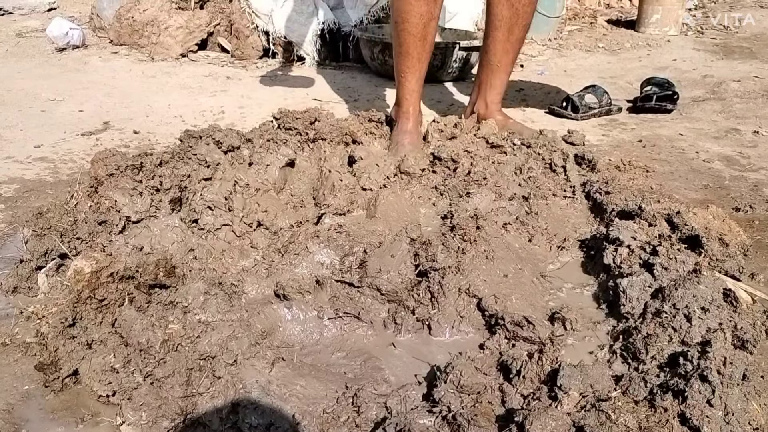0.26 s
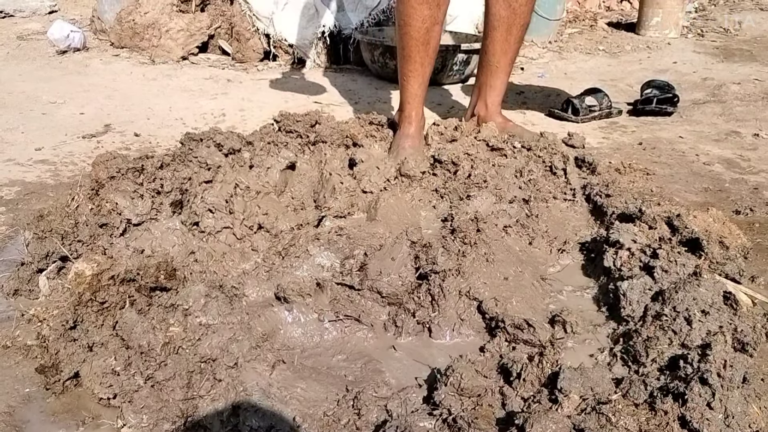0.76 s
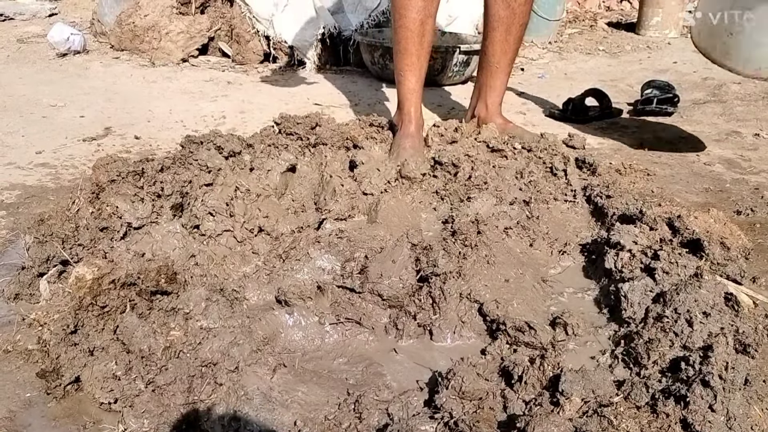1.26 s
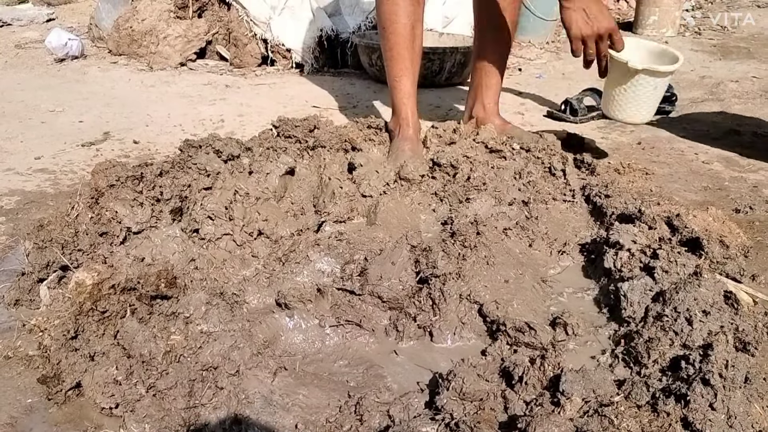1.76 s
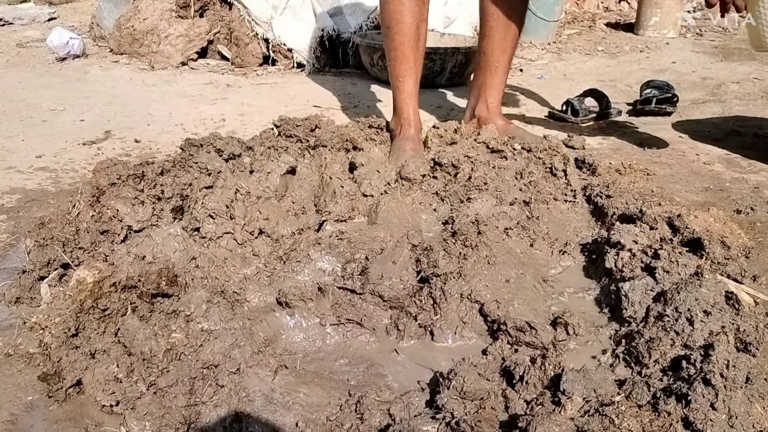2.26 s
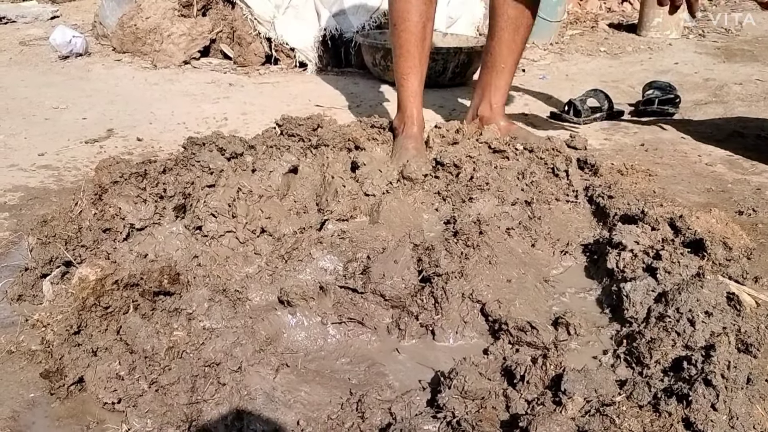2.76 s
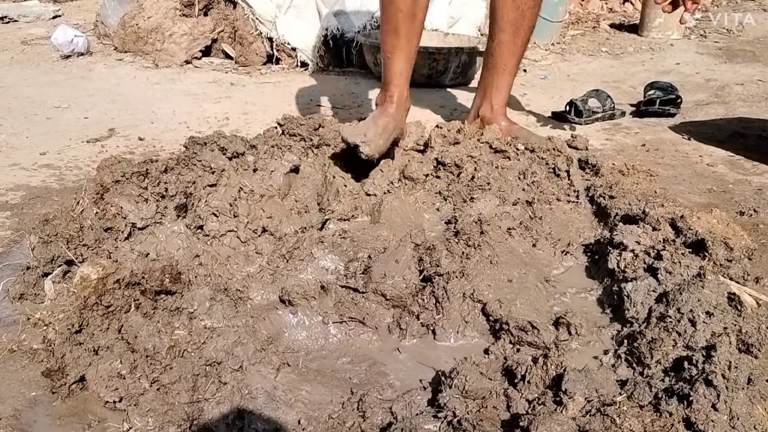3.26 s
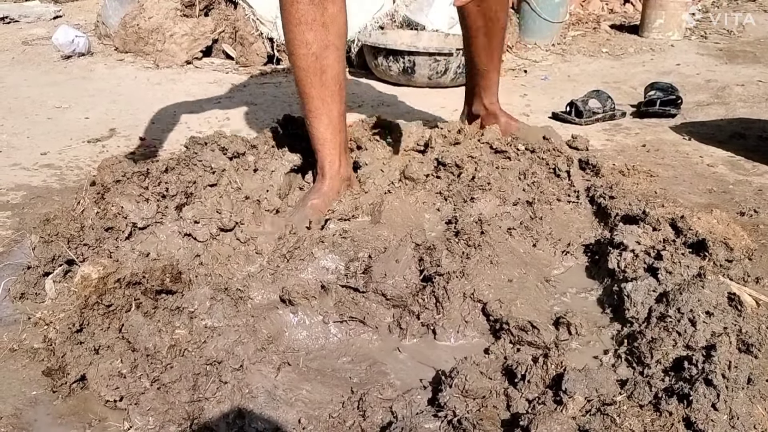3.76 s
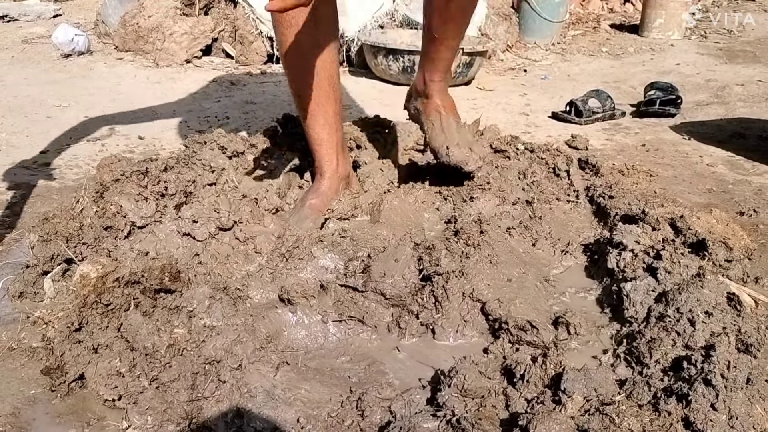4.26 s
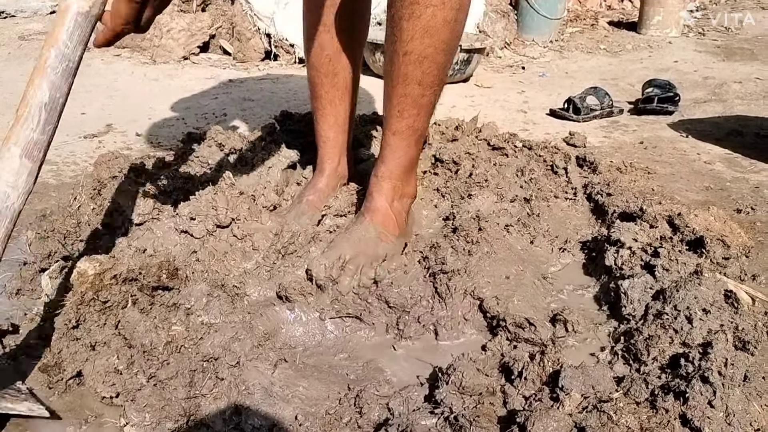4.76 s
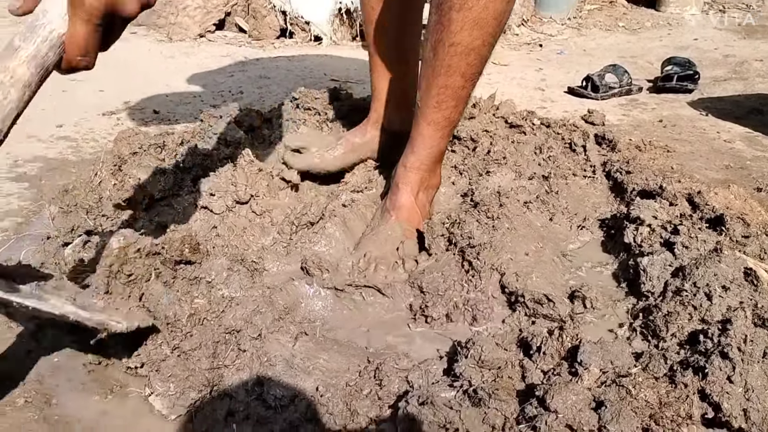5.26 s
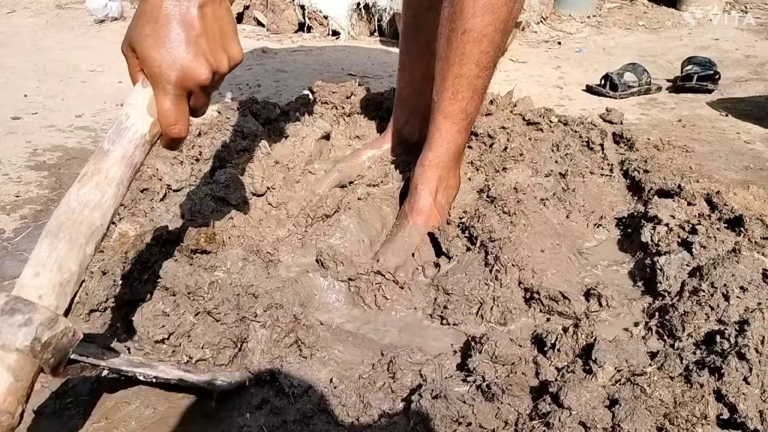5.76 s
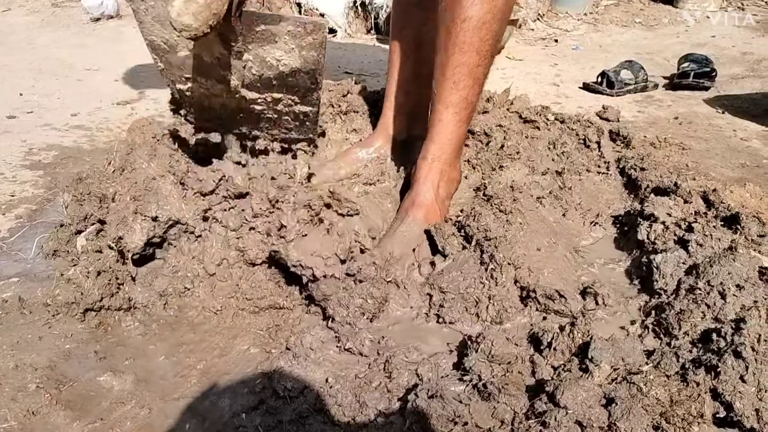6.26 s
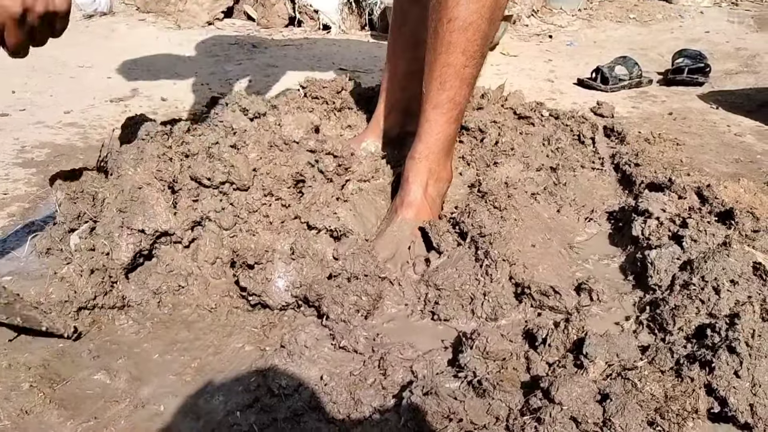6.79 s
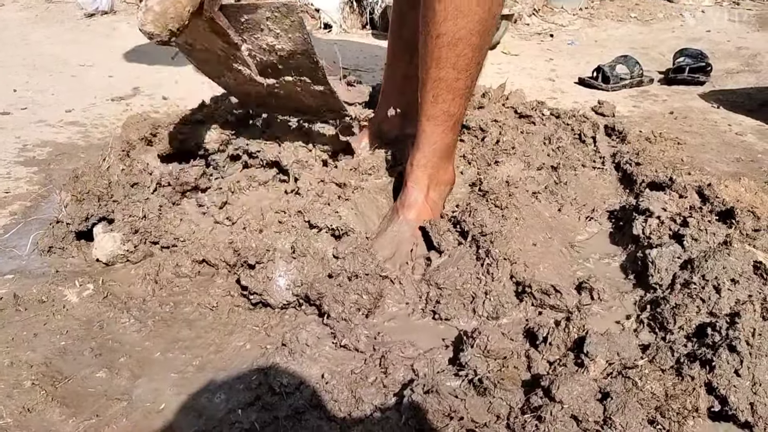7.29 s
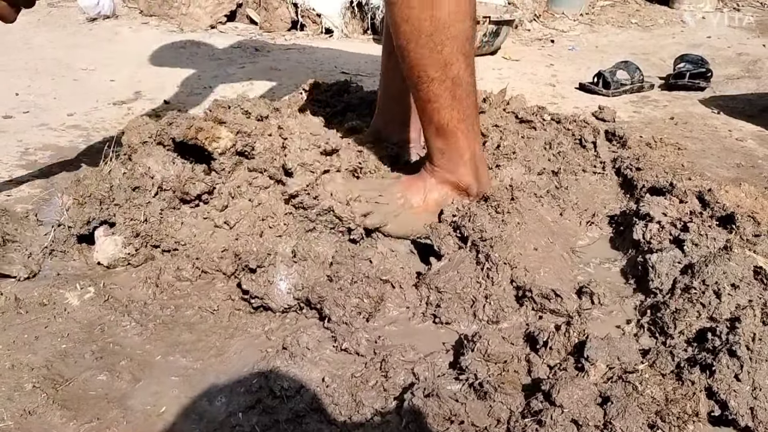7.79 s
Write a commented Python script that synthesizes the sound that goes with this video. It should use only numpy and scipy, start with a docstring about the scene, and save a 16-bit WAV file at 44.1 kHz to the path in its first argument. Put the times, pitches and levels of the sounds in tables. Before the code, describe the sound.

Close to the microphone outdoors, wet clay gives one short squelch, then a plastic tub and a jug hit the ground in turn, ringing hollowly and rattling as they settle. Bare feet begin treading the clay and a hoe joins in, with sticky slaps, sucking tears and little bursts of air. Behind it all a small engine chugs on, with light hiss, a little wind and faint distant birds.

```python
"""Wet clay and a yard engine

Across a yard a small one-cylinder engine putters steadily, its puffs ringing the exhaust pipe, its beat
skipping now and then at cuts in the sound. Hiss, drone, wind and far birds lie behind. A plastic tub
and jug are dropped and rock to rest, their walls ringing. Bare feet and a hoe slap, crackle and suck in
wet clay as it tears and its air pockets burst, close to a phone whose left port hears more treble."""
import sys
import numpy as np
from scipy import signal
from scipy.fft import rfft, irfft
from scipy.io import wavfile
from scipy.ndimage import uniform_filter1d

SR = 44100
rng = np.random.default_rng(int(sys.argv[2]) if len(sys.argv) > 2 else 0)


def unload_wav(signal):
    """Save mono or channel-first audio to the path in sys.argv[1] as 16-bit WAV at rate SR, clipped to [-1, 1]."""
    wavfile.write(
        sys.argv[1],
        SR,
        np.round(np.clip(np.atleast_2d(signal).T, -1, 1) * 32767).astype(np.int16),
    )


N = 354123
T = np.arange(N) / SR


def undb(db):
    """Level to gain."""
    return 10 ** (np.asarray(db, float) / 20)


def unit_rms(x):
    """Scale to rms 1."""
    return x / np.sqrt(np.mean(x ** 2))


def unit_peak(x):
    """Scale to peak 1."""
    return x / np.abs(x).max()


def decay(t, t60_s):
    """Fall of 60 dB per t60_s."""
    return 1000 ** (-t / t60_s)


def colour(x, points, db_scale=1):
    """Minimum-phase filter through (f/Hz, gain/dB) points."""
    hz, db = np.transpose(points)
    bin_db = np.interp(np.log(np.arange(1025) * SR / 2048 + 1), np.log(hz), db)
    cepstrum = irfft(db_scale * np.log(undb(bin_db)))
    cepstrum[1:1024] *= 2
    cepstrum[1025:] = 0
    return signal.oaconvolve(x, irfft(np.exp(rfft(cepstrum))))[:len(x)]


def band(x, hz, width_hz):
    """Resonance, unity gain at centre."""
    return signal.lfilter(*signal.iirpeak(hz, hz / width_hz, SR), x)


def highpass(x, hz):
    """Bass cut, 4th order."""
    return signal.sosfilt(signal.butter(4, hz, "high", fs=SR, output="sos"), x)


def walk(rate_hz):
    """Slewed random steps, spread of order 1."""
    hold = int(SR / rate_hz)
    steps = rng.standard_normal(N // 50)[:N // hold + 1]
    return 1.71 * uniform_filter1d(np.repeat(steps, hold)[:N], hold)


def grit(size, spread_db):
    """Crackle: noise with uneven sample sizes, rms 1."""
    noise = rng.standard_normal(size)
    return unit_rms(noise * undb(spread_db * np.minimum(rng.exponential(size=size), 4)))


def add(track, start_s, sound):
    """Mix into track in place."""
    i = int(start_s * SR)
    track[..., i:i + sound.shape[-1]] += sound[..., :N - i]


def ports(x, pan_db, direct_share, lag_samples=0):
    """Two microphone ports: direct sound, left lagging, plus scattered paths."""
    spectra = rfft(rng.standard_normal((2, 128)) * np.exp(-np.arange(128) / 16))
    paths = np.pad(irfft(spectra / np.abs(spectra)), ((0, 0), (0, 300)))
    paths = highpass(paths, 295)  # long waves reach both ports alike
    scattered = np.array([signal.oaconvolve(x, path)[:len(x)] for path in paths])
    direct = np.array([np.roll(x, lag_samples), x])
    both = np.sqrt(direct_share) * direct + np.sqrt(1 - direct_share) * scattered
    return both * undb(np.array([[pan_db], [-pan_db]]) / 2)


# gusts: t/s, relative level/dB
GUSTS = [(0.0, -66), (0.67, -46.5), (1.7, -59), (1.85, -63), (3.4, -74), (4.6, -88), (5.0, -71),
         (6.2, -92.5), (8.03, -71)]


def wind():
    """Gusts rumble on the ports, nearly alike at both."""
    passband = signal.butter(2, [22, 75], "band", fs=SR, output="sos")
    noise = signal.sosfilt(passband, rng.standard_normal((3, N)))
    rumble = unit_rms(noise[0] + 0.098 * noise[1:])
    return rumble * undb(np.interp(T, *np.transpose(GUSTS)) - 8 + 2.2 * walk(7.7))


# pitch contours by name: f/Hz at even steps
TUNES = {"rise": [3950, 4100, 4800, 5050], "flat": [4300, 4380, 4350, 4270], "arch": [1244, 1290, 1260,
         1180], "hook": [1100, 1315, 1345, 1345, 1335, 1310, 1260]}
# calls: t/s, length/s, level/dB, tune
BIRD_CALLS = [(0.77, 0.12, -62, "rise"), (1.73, 0.13, -54, "flat"), (1.88, 0.4, -55, "arch"),
              (2.66, 0.12, -61, "rise"), (2.77, 0.33, -51, "hook"), (3.96, 0.11, -70, "rise"),
              (4.74, 0.11, -62, "rise")]


def birds():
    """Thin whistles, blurred by distance into narrow noise."""
    out, low_flutter, high_flutter = np.zeros(N), walk(130), walk(290)
    for s, length_s, db, tune in BIRD_CALLS:
        span = slice(int(s * SR), int((s + length_s) * SR))
        hz = np.interp(T[span], np.linspace(s, s + length_s, len(TUNES[tune])), TUNES[tune])
        blur = 1 + .9 * (low_flutter if hz[0] < 2000 else high_flutter)[span]
        whistle = np.sin(2 * np.pi * np.cumsum(hz) / SR)
        out[span] += undb(db) * signal.windows.tukey(len(hz), .35) * blur * whistle
    return ports(out, pan_db=8, direct_share=.95, lag_samples=3)


# yard swell: t/s, relative level/dB, drone offset/dB
YARD_SWELL = [(0.0, -52, 1.5), (0.8, -50, 2), (1.2, -53.5, 3.5), (1.802, -50.5, 3.5), (2.37, -51, 5.5),
              (2.7, -52.5, 1.5), (3.15, -51.5, 4.5), (3.499, -54.5, 4), (4.27, -53.5, 1.5),
              (4.74, -55.5, 3), (5.3, -55, 0.5), (5.999, -52, 2), (6.552, -48, 1), (6.802, -60.5, 2.5),
              (7.1, -46, -5.5), (7.35, -60.5, 3), (7.7, -54, -2.5), (8.03, -56.5, 10)]
# hum envelope: t/s, level/dB
HUM_LEVELS = [(0.0, -60.5), (0.87, -52), (1.25, -62.5), (1.65, -73), (2.21, -53.5), (2.59, -62.5),
              (2.97, -63), (3.13, -34.5), (3.4, -60), (4.18, -63), (5.03, -53), (5.46, -69.5), (6.06, -49),
              (6.93, -66.5), (7.58, -63.5), (8.03, -62)]
# drone spectrum: f/Hz, gain/dB
DRONE_SPECTRUM = [(15, -36.5), (25, -31.5), (85, -13), (145, -1), (189, -3.5), (257, -4.5), (312, -7.5),
                  (474, -13.5), (700, -68), (910, -61.5), (1540, -120)]
# hiss spectrum: f/Hz, gain/dB
HISS_SPECTRUM = [(350, -29.5), (600, -5), (731, -13.5), (883, -3.5), (1210, 3), (1580, -8.5), (1840, -3),
                 (2500, 2.5), (2760, 0.5), (3860, 0), (4480, -11.5), (5740, -6), (6400, -26), (8320, -83),
                 (14100, -120)]
# port imbalance: f/Hz, left minus right/dB
PORT_BALANCE = [(60, -2), (100, -0.5), (170, 3), (290, 3.5), (490, 1.5), (830, 3.5), (1400, 10.5),
                (2370, 10.5), (4010, 10.5), (6780, -1.5)]


def yard(gas_envelope):
    """Drone and hum; background hiss and engine gas, with a warble like compressed audio."""
    s, level_db, drone_db = np.transpose(YARD_SWELL)
    swell = undb(np.interp(T, s, level_db) + 1.7 * walk(25))
    hum_gain = undb(np.interp(T, *np.transpose(HUM_LEVELS)) + 2.5 * walk(5))
    hum = hum_gain * unit_rms(band(rng.standard_normal(N), hz=383.7, width_hz=14))
    drone = unit_rms(colour(rng.standard_normal(N), DRONE_SPECTRUM))
    drone *= swell * undb(np.interp(T, s, drone_db))
    warble = [(hz, undb(2.3 * walk(26))) for hz in np.geomspace(700, 6300, 15)]
    out = []
    for side in (.5, -.5):  # left, right
        noise = grit(N, 0.5)
        warbled = sum(gain * band(noise, hz, hz / 9) for hz, gain in warble)
        hiss = (undb(2) * swell + gas_envelope) * unit_rms(colour(warbled, HISS_SPECTRUM))
        out.append(colour(hiss + drone + hum, PORT_BALANCE, db_scale=side))
    return np.array(out)


# runs of steady puffs between cuts in the sound: first t/s, last t/s, first level/dB, last level/dB
PUFF_RUNS = [(0.024, 0.024, -33, -33), (0.06, 0.368, -31.5, -28), (0.485, 1.02, -28.5, -33),
             (1.135, 1.915, -31.5, -32.5), (1.993, 2.527, -34, -34), (2.644, 3.338, -34, -32),
             (3.457, 4.313, -39, -39), (4.436, 4.523, -38, -38), (4.477, 4.889, -36, -31),
             (4.933, 5.183, -33, -33), (5.139, 5.553, -33, -35), (5.712, 6.1, -34, -32),
             (6.178, 6.729, -32, -33), (6.808, 6.886, -38, -42), (7.004, 7.235, -36, -32),
             (7.353, 7.976, -32, -30)]
# weaker pulses after a puff: delay/s, gain
AFTER_PULSES = [(.0115, .22), (.029, .14), (.0385, -.24), (.053, .08)]
# exhaust pipe modes: f/Hz, width/Hz, relative level/dB
PIPE_MODES = [(203, 106, 3), (347, 390, 0.5)]


def engine(period_s=.079, scatter_db=1.5):
    """Puffs ring the pipe and spit a little gas; returns thump and gas envelope."""
    beats = np.zeros(N)
    for first_s, last_s, first_db, last_db in PUFF_RUNS:
        count = round((last_s - first_s) / period_s) + 1
        db = np.linspace(first_db, last_db, count) + scatter_db * rng.standard_normal(count)
        beats[(np.linspace(first_s, last_s, count) * SR).astype(int)] = undb(db)
    pulses, t = np.zeros(4000), T[:4000]
    pulses[0] = 1
    for delay_s, gain in AFTER_PULSES:
        pulses[int(delay_s * SR)] = gain
    ring = sum(undb(db) / width_hz * band(band(pulses, hz, width_hz), hz, width_hz)
               for hz, width_hz, db in PIPE_MODES)
    puff = highpass(np.convolve(ring, np.hanning(110)), 90)  # valve opens over a few ms
    spit = undb(-13) * np.exp(-t / 0.007) * (1 - np.exp(-t / 0.003))
    return signal.oaconvolve(beats, unit_peak(puff))[:N], signal.oaconvolve(beats, spit)[:N]


def wall_ring(t, modes, tilt_db, stiffness, light):
    """One blow rings the wall, peak 1; stiffer is shorter. Light knocks land anywhere, ground-damped."""
    scatter = rng.standard_normal((len(modes), 3)) * light
    t60_scale = .5 if light else 1
    ring = np.zeros(len(t))
    for (hz, db, t60_s), (jitter, detune, phase) in zip(modes, scatter):
        gain = undb(db + tilt_db * np.log2(hz / 300) + 2.9 * jitter)
        tone = np.sin(2 * np.pi * hz * (1 + 0.011 * detune) * t + phase)
        ring += gain * tone * decay(t, t60_scale * t60_s)
    push = np.hanning(max(int(SR * 0.0046 * (1.05 - np.clip(stiffness, 0, 1))), 3))
    ring = signal.fftconvolve(ring, push)[:len(t)]
    return unit_peak(highpass(ring, 178))  # small source, no deep bass


# plastic crack spectrum: f/Hz, gain/dB
CRACK_SPECTRUM = [(500, -29.5), (1100, 2), (1700, -14.5), (2900, -0.5), (4000, -12.5), (5500, -31),
                  (6800, -45), (9000, -55)]


def vessel(knocks, modes, rim_modes, rocking, stiffness, stiffness_per_db, polarity):
    """Knocks ring plastic, thump soil and crack grit; hard ones ring the rim and snap. Rocking rumbles."""
    wall, crack, snap = np.zeros((3, N))
    t = T[:13000]
    soil_thump = undb(-28.5) * np.hanning(int(0.0082 * SR))
    crack_envelope = decay(t[:2000], 0.069) + 0.74 * np.exp(-t[:2000] / 0.0002)
    rim = sum(undb(db) * np.sin(2 * np.pi * hz * t) * decay(t, t60_s) for hz, db, t60_s in rim_modes)
    for s, db, crack_db, tilt_db in knocks:
        ring = wall_ring(t, modes, tilt_db, stiffness + stiffness_per_db * db, light=db < -6)
        add(wall, s + 0.0017, polarity * undb(db) * ring)  # -1: wall moves inward first
        add(wall, s + 0.0011, -undb(db) * soil_thump)
        add(wall, s + .003, undb(2 * db) * rim)
        add(crack, s + 0.00051, undb(db + crack_db) * grit(2000, 0.63) * crack_envelope)
        add(snap, s + .002, undb(3 * db - 15) * grit(400, 1.5) * np.exp(-t[:400] / .0012))
    scrape = grit(N, 0.94) * undb(2 * walk(63))
    rumble = unit_rms(sum(undb(db) * band(scrape, hz, 21) for hz, db, _ in modes[:7]))
    wall += rumble * undb(np.interp(T, *np.transpose(rocking), left=-120, right=-120))
    crack = colour(crack, CRACK_SPECTRUM) * undb(6) + highpass(highpass(snap, 8500), 8500)
    return ports(wall, pan_db=1.4, direct_share=0.92) + ports(crack, pan_db=3.2, direct_share=0.34)


# knocks: t/s, level/dB, crack offset/dB, mode tilt/(dB/octave)
TUB_KNOCKS = [(1.969, 2.5, -23, -1), (2.014, -8.5, -47, -7), (2.085, -15, -26, 0), (2.095, -18, -18, -4),
              (2.168, -17.5, -39, 10), (2.239, -22.5, -29, 9), (2.251, -21, -27, 6), (2.262, -23.5, -37, 2),
              (2.295, -27.5, -6, 7), (2.336, -19, -22, 4), (2.371, -15.5, -28, 11), (2.384, -19, -37, 14),
              (2.425, -20, -21, -3), (2.445, -26.5, -32, 2)]
JUG_KNOCKS = [(2.901, -23.5, -3.5, -10), (2.992, 0, -14.5, 4.5), (3.018, -14, -7, -6), (3.041, -14, -20, 7),
              (3.055, -12.5, -19, 5), (3.07, -20, -16, -1), (3.093, -21, -8, 4), (3.154, -13.5, -8, -6),
              (3.18, -22.5, -41, 2), (3.2, -17, -17, 3), (3.222, -17, -11, 2.5), (3.232, -22.5, -5, 2),
              (3.258, -21, -13, 4.5), (3.293, -37, -25, 8)]
# wall and rim modes: f/Hz, relative level/dB, t60/s
TUB_MODES = [(138.4, 5.5, 0.23), (268, 3, 0.29), (161, -3.5, 0.18), (207, 6, 0.051), (320, 12.5, 0.042),
             (365, -12.5, 0.018), (490, -4, 0.083), (590, -33.5, .06)]
JUG_MODES = [(217, -12.5, 0.12), (248.5, -2, 0.48), (295.4, -6.5, 0.3), (352, 8, 0.027), (364, 0, 0.19),
             (481, -7, 0.13), (586, -13.5, 0.3), (806, -20.5, 0.13), (965, -19.5, .1), (1160, -24, 0.069)]
TUB_RIM = [(950, -23.5, .03), (1044, -21, 0.027), (1190, -35, 0.017), (3270, -31.5, 0.015)]
JUG_RIM = [(2106, -23, 0.043), (2955, -8, 0.011), (4180, -39, 0.014)]
# rocking rumble: t/s, level/dB
TUB_ROCK = [(1.99, -44), (2.15, -53), (2.52, -70)]
JUG_ROCK = [(2.88, -47.5), (3.076, -31), (3.15, -65), (3.34, -70)]


def dropped_vessels():
    """A tub, then a stiffer jug, hit the ground and rock to rest."""
    tub = vessel(TUB_KNOCKS, TUB_MODES, TUB_RIM, TUB_ROCK,
                 stiffness=0.55, stiffness_per_db=0.012, polarity=-1)
    jug = vessel(JUG_KNOCKS, JUG_MODES, JUG_RIM, JUG_ROCK,
                 stiffness=0.83, stiffness_per_db=0.0086, polarity=1)
    return tub + jug


def pops(low_hz, high_hz, q, band_rate_hz=300):
    """Air pockets burst at random: lone pulses into nine resonances, rms 1."""
    sizes, draw = grit(N, 3.9), rng.random(N)
    band_index = np.floor(draw * SR / band_rate_hz)
    return unit_rms(sum(band(sizes * (band_index == i), hz, hz / q)
                        for i, hz in enumerate(np.geomspace(low_hz, high_hz, 9))))


# clay crackle and wet body spectra: f/Hz, gain/dB
CRACKLE_SPECTRUM = [(940, -44), (1600, -17.5), (2060, 1.5), (2630, 8), (3060, 0), (3670, 1.5), (3910, -1.5),
                    (4220, -3.5), (4550, -13), (5740, -6), (7200, -42), (9360, -46), (15800, -120)]
BODY_SPECTRUM = [(160, -39), (280, -20.5), (318, -6.5), (524, -2.5), (693, -18.5), (776, -7), (1000, -1),
                 (1260, 1.5), (1700, -15), (2210, -41.5), (3740, -120)]
# squelches: peak t/s, 20 dB rise/s, 20 dB fall/s, relative crackle level/dB, relative body level/dB
SQUELCHES = [(0.942, 0.006, 0.1, -44, -38), (0.975, .03, .12, -39, -48), (1.005, .01, .09, -43, -46),
             (3.629, 0.06, 0.1, -45.5, -60), (3.746, 0.004, 0.05, -36, -35),
             (3.769, 0.025, 0.025, -33, -36), (3.801, .003, .045, -37, -44), (4.545, .04, .04, -37, -52),
             (4.562, .01, .08, -38, -47), (4.61, .03, .05, -43, -51), (4.677, 0.014, 0.035, -32, -46),
             (4.765, .03, .05, -40, -52), (4.9, .1, .06, -43, -50), (4.938, 0.02, 0.05, -33, -46),
             (4.98, .05, .3, -46, -56), (5.62, 0.01, 0.11, -36, -38), (5.8, .01, .1, -41, -43),
             (5.818, 0.01, 0.08, -36, -41.5), (5.908, 0.12, 0.08, -36, -39), (5.97, .01, .07, -34, -36),
             (6.005, 0.05, 0.14, -31, -35), (6.045, 0.006, 0.06, -30, -36), (6.063, .02, .06, -33, -34),
             (6.11, .04, .12, -40, -43), (6.151, 0.003, 0.95, -52, -64.5), (6.58, 0.02, 0.1, -40, -51),
             (6.633, 0.04, 0.0666, -30.5, -37.5), (6.952, 0.003, 0.07, -45, -37.5),
             (7.0, .02, .2, -43, -50), (7.068, .01, .08, -36, -40), (7.09, .015, .04, -36, -36),
             (7.108, 0.0153, 0.08, -33, -34.5), (7.15, .04, .2, -41, -48), (7.219, 0.003, 0.03, -53, -43),
             (7.52, .02, .08, -43, -56), (7.57, 0.1, 0.13, -41, -53.5), (7.76, 0.27, 0.6, -47, -67),
             (7.9, .03, .1, -40, -52), (7.916, 0.003, 0.03, -33, -40), (7.94, .03, .15, -39, -52),
             (8.015, 0.08, 0.05, -35.5, -49)]


def squelches(patchy_db=2.2):
    """Worked clay tears and crumbles unevenly: crackle over a wet midrange body."""
    crackle, body = np.zeros((2, N))
    for s, rise_s, fall_s, crackle_db, body_db in SQUELCHES:
        envelope = undb(-20 * np.where(T < s, (s - T) / rise_s, (T - s) / fall_s))
        crackle += undb(crackle_db) * envelope
        body += undb(body_db) * envelope
    crackle *= undb(patchy_db * walk(90) - 3)
    crackle *= unit_rms(colour(pops(2054, 5970, q=8.4) + 3.3 * grit(N, 9.4), CRACKLE_SPECTRUM))
    body *= undb(patchy_db * walk(60) - 2.5)
    body *= unit_rms(colour(pops(280, 1590, q=5) + 5.1 * grit(N, 2.5), BODY_SPECTRUM))
    return (ports(crackle, pan_db=7, direct_share=0.44, lag_samples=7)
            + ports(body, pan_db=0.62, direct_share=0.54, lag_samples=3))


# slaps and pops in clay: t/s, relative level/dB, pocket f/Hz, thud offset/dB
SLAPS = [(0.898, -39, 420, 5.5), (0.911, -29, 4160, 2), (0.936, -26, 1000, 7.5), (0.944, -27.5, 640, 4),
         (0.952, -20.5, 1150, -5), (0.969, -26, 3500, -10), (0.98, -35, 3550, -11), (0.99, -43, 3480, -9),
         (1.001, -39, 1150, -16), (1.044, -43, 1150, -17), (3.63, -36, 1250, -20), (3.744, -18, 1140, -7.5),
         (3.748, -16, 2630, -25), (3.753, -15.5, 840, -5.5), (3.764, -17.5, 950, -12),
         (3.767, -20, 4450, -23), (3.767, -21, 2550, -26), (3.798, -25, 830, -6), (3.799, -10.5, 2170, -23),
         (3.7995, -22, 3300, -14.5), (4.518, -36, 370, -10), (4.535, -32, 3850, -36),
         (4.546, -26, 3800, -36), (4.559, -29.5, 2600, -4.5), (4.575, -25, 3700, -16),
         (4.611, -34, 1500, -25), (4.649, -38, 1200, -29), (4.669, -25, 3500, -20),
         (4.674, -17.5, 3300, -28), (4.681, -25, 2900, -21), (4.675, -31, 483, -14), (4.688, -49, 497, -12),
         (4.761, -21, 2800, -36), (4.874, -32, 1460, -30), (4.931, -18, 2500, -11), (4.939, -19, 2400, -24),
         (4.944, -26, 3900, -20), (5.015, -24, 3950, -27), (5.113, -27, 2440, -18), (5.618, -10, 1400, -18),
         (5.62, -12, 3450, -23), (5.622, -8.5, 2280, -32), (5.632, -21.5, 2230, -8),
         (5.795, -24, 1150, -29), (5.815, -16, 3750, -17), (5.826, -22, 2040, -15), (5.837, -39, 1310, -24),
         (5.867, -35, 2500, -25), (5.908, -17.5, 970, -12), (5.968, -22.5, 1220, 1),
         (5.973, -25, 2500, -23), (5.984, -17.5, 2400, -8.5), (5.986, -16, 1490, -20),
         (6.003, -10, 2500, -28), (6.01, -14, 2900, -18), (6.025, -19, 3000, -25), (6.032, -22, 1600, -14),
         (6.044, -7, 3660, -13.5), (6.048, -7.5, 2770, -22), (6.06, -18.5, 1280, 2.5),
         (6.064, -21, 2400, -20), (6.095, -35, 1130, -20), (6.206, -23.5, 2400, -37),
         (6.578, -15.5, 2500, -43), (6.629, -10, 2320, -22.5), (6.948, -15, 870, -10),
         (6.95, -16, 3850, -30), (6.959, -32.5, 366, 1), (6.99, -25, 3700, -31), (7.065, -40, 1340, -22),
         (7.073, -9, 3770, -44), (7.084, -21, 1220, -27), (7.103, -26, 1110, -21), (7.113, -19, 1430, -24),
         (7.127, -29.5, 1090, -9), (7.174, -26.5, 2520, -21), (7.214, -27, 1110, -32),
         (7.238, -45, 2430, -30), (7.267, -41, 5650, -34), (7.543, -13.5, 2580, -38),
         (7.557, -31, 2580, -26), (7.571, -21, 3620, -32), (7.594, -9.5, 2640, -49),
         (7.606, -17, 3300, -37), (7.632, -24, 3000, -33), (7.684, -18.5, 2920, -43),
         (7.906, -24, 3320, -8), (7.915, -19, 2750, -10.5), (7.931, -20.5, 2880, -13),
         (7.991, -23.5, 2520, -20), (8.002, -16, 2710, -29), (8.012, -33, 2510, -26),
         (8.023, -17.5, 1080, -29)]


def slaps(rise_s=0.00061, spray_t60_s=0.059):
    """A tick and a burst of grit ring a pocket in the clay, over wet spatter and a dull thud."""
    out, t = np.zeros((2, N)), T[:4400]
    for s, db, hz, thud_db in SLAPS:
        t60_s = max(0.051 * (hz / 1000) ** -0.7, .004)  # small, high pockets die sooner
        width_hz = .24 * hz
        grains = grit(len(t), 0.64) * (1 - np.exp(-t / rise_s))
        grains[round(rise_s * SR)] = 5  # tick of first contact
        burst = grains * decay(t, t60_s)
        spray = burst + 0.22 * grains * decay(t, spray_t60_s)
        pocket = unit_peak(band(band(burst, hz, width_hz), hz, 2 * width_hz))
        spatter = unit_peak(colour(spray, BODY_SPECTRUM[2:-2] + CRACKLE_SPECTRUM[1:]))
        thud = unit_peak(band(band(burst, 380, 420), 370, 480))
        slap = undb(db) * (0.5 * pocket + 0.32 * spatter + 0.008 * burst)
        add(out, s, ports(slap, pan_db=6, direct_share=0.57, lag_samples=8))
        add(out, s, undb(db + thud_db) * thud)
    return out


# level dips: t/s, depth/dB, half width/s
DIPS = [(1.209, 10.5, 0.0069), (2.609, 7, 0.045), (3.449, 14.5, 0.014), (3.522, 14, 0.011),
        (4.002, 14, 0.011), (4.076, 12, 0.012), (4.22, 15.5, 0.015), (4.409, 10.5, 0.023),
        (5.343, 8.5, 0.039), (6.721, 16, 0.013), (6.919, 19, 0.0085), (7.428, 8.5, 0.011),
        (7.499, 3, 0.014)]


def dips():
    """Gain curve: the level dips briefly and smoothly."""
    db = np.zeros(N)
    for s, depth_db, half_width_s in DIPS:
        add(db, s - 2 * half_width_s, -depth_db * np.hanning(int(4 * half_width_s * SR)))
    return undb(db)


def scene():
    """Engine and yard behind, vessels and clay in front."""
    thump, gas_envelope = engine()
    far = ports(thump, pan_db=1, direct_share=0.82) + yard(gas_envelope) + wind() + birds()
    near = dropped_vessels() + slaps() + squelches()
    return dips() * (far + near)


def record(dry, step_hz=6900, top_hz=15600):
    """Phone: step down above the speech band, rounded peaks, faint hiss, steep top cut."""
    stepped = signal.sosfilt(signal.ellip(5, .3, 28, step_hz, fs=SR, output="sos"), dry)
    rounded = np.tanh(0.6 * stepped) / 0.84
    hiss = undb(-112) * rng.standard_normal(N)
    return signal.sosfilt(signal.ellip(8, .2, 70, top_hz, fs=SR, output="sos"), rounded + hiss)


dry = scene()
out = record(dry)
unload_wav(out)
```